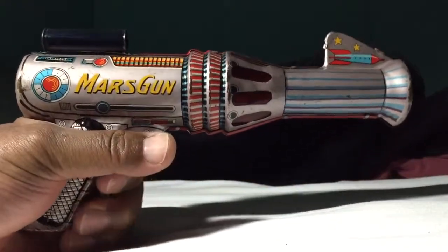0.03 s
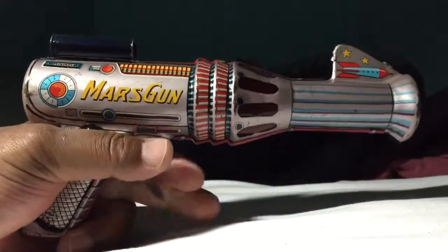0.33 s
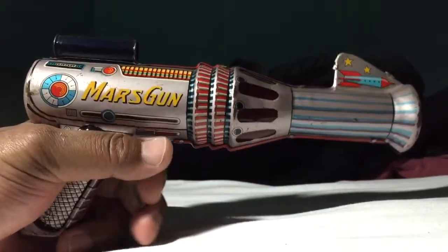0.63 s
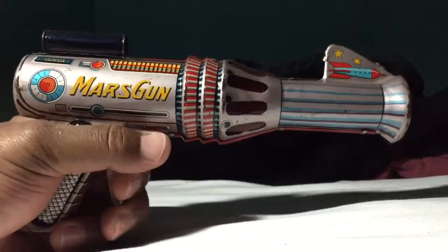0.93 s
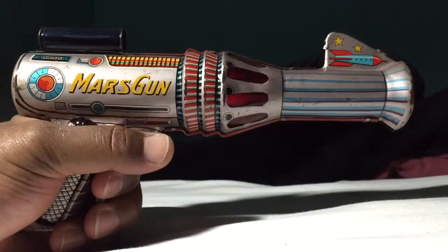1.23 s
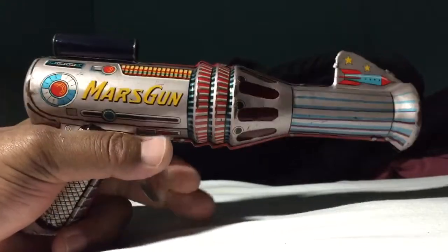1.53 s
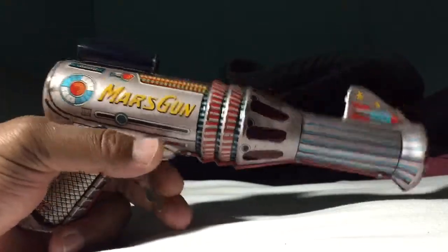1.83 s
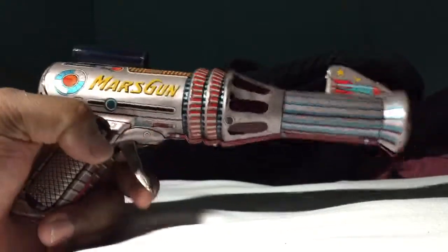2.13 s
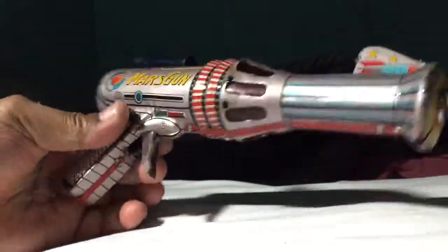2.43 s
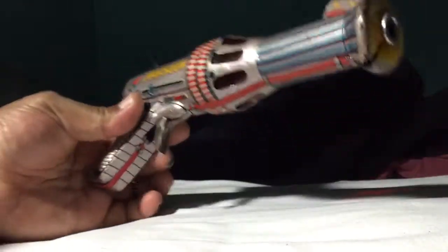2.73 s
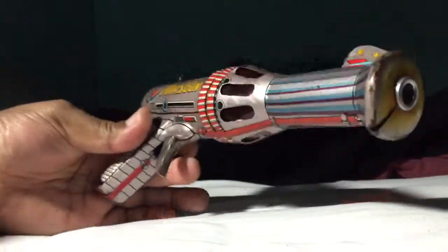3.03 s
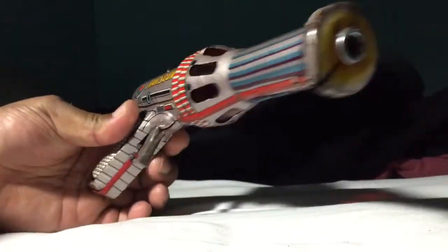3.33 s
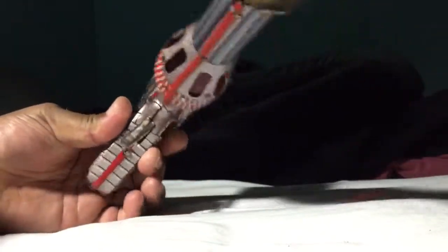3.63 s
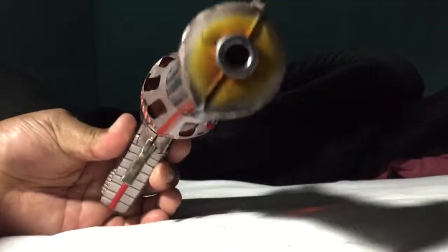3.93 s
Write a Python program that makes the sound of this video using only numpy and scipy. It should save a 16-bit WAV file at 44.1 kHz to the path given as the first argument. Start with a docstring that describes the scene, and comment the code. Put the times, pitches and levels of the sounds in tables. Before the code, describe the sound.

A tin toy gun is fired twice, its gears rattling and flywheel rasping with a thin squeal before winding down. Then the tin shell clicks as it is turned in the hand, close by in a small, quiet room.

```python
"""Tin friction toy gun

The toy is fired twice, close by in a small, soft room. Each squeeze drives rattling gears
that spin up a flywheel. Its axle squeals, and the wheel scrapes a flint once a turn, rings,
and coasts down to separate ticks. Then the trigger slides back and the tin shell clicks
as it is turned in the hand."""
import sys
import numpy as np
from scipy import signal
from scipy.fft import rfft, irfft
from scipy.io import wavfile
from scipy.ndimage import uniform_filter1d

SR = 44100
rng = np.random.default_rng(int(sys.argv[2]) if len(sys.argv) > 2 else 0)


def output_pcm(signal):
    """Save a mono or channel-first signal as 16-bit PCM at the path in sys.argv[1].

    Samples are clipped to [-1, 1] before scaling.
    """
    pcm = np.clip(np.atleast_2d(signal).T, -1, 1) * 32767
    wavfile.write(sys.argv[1], SR, np.round(pcm).astype(np.int16))


N = 176400
T = np.arange(N) / SR

# How fast the gear teeth meet. Each row: time in seconds, teeth per second.
TOOTH_RATE = [(0, 289.5), (.14, 289.3), (.2, 233.3), (.4, 224.5), (.5, 208.2), (.6, 168.2), (.8, 109.9),
              (.92, 269.4), (.98, 264), (1.02, 252), (1.06, 270.1), (1.15, 274.9), (1.25, 330),
              (1.42, 238.5), (1.5, 241.7), (1.56, 274), (1.7, 211.8), (1.84, 152.8)]
# The tones of the tin shell. Each row: pitch in Hz, width in Hz, level in dB.
SHELL_TONES = [(1190, 98, -1), (1425, 26, 6.5), (1544, 13, -6.5), (1870, 26, 11), (2430, 45, 6),
               (3140, 62, 11), (3540, 39, -4), (4400, 61, 4), (5460, 51, 0), (6400, 150, 3.5),
               (6380, 130, 1), (7950, 58, 1.5)]


def flywheel():
    """Once a turn the wheel rubs the flint, which makes a rasp and jolts the wheel's own ring."""
    # How fast the wheel spins. Each row: time in seconds, turns per second.
    wheel_speed = [(0, 600), (.13, 561), (.2, 471), (.4, 281), (.55, 156), (.64, 105), (.71, 97),
                   (.79, 140), (.85, 210), (.9, 302), (.96, 519), (1.27, 628), (1.55, 315), (1.7, 190),
                   (1.8, 124), (1.92, 63), (1.97, 43), (2.0, 25), (2.04, 15)]
    speed = in_time(wheel_speed)
    turns = np.cumsum(speed) / SR
    turn, part_of_turn = turns.astype(int), turns % 1
    strength, kick = rng.standard_normal((2, turn[-1] + 1))
    pressure = flint_pressure(speed, turn, part_of_turn, strength)
    return flint_rasp(pressure, speed) + wheel_ring(part_of_turn, kick[turn])


def flint_pressure(speed, turn, part_of_turn, strength):
    """The flint presses hard early in each turn. A faster wheel rubs for more of it and chatters more."""
    pace = speed / 100  # 1 at 100 turns per second
    rise_share, rub_share, drag_share = 0.05, 0.24 * pace, 0.37  # shares of one turn
    rub = np.minimum(part_of_turn / rise_share, 1) * np.exp(-(part_of_turn / rub_share) ** 2)
    light_drag = from_db(-20) * (part_of_turn < drag_share)
    chatter = from_db(-12) * np.minimum(pace, 2) ** 1.4
    pressure = (rub + light_drag) * from_db(1.2 * strength)[turn] + chatter
    # Even out the power over five turns, so longer rubs are not louder.
    turn_power = np.bincount(turn, pressure ** 2) / np.bincount(turn)
    return pressure / np.sqrt(uniform_filter1d(turn_power, size=5))[turn]


def flint_rasp(pressure, speed):
    """Grit on the wheel strikes the flint in tiny blows that shake the frame."""
    # How loud the rasp is. Each row: time in seconds, level in dB.
    rasp_level = [(0, -18), (.1, -20.5), (.2, -22), (.45, -21), (.6, -23), (.73, -23.5), (.86, -20),
                  (1.0, -20), (1.2, -18.5), (1.42, -22), (1.57, -24.5), (1.8, -23.5), (1.92, -25.5),
                  (2.005, -25), (2.02, -40), (2.045, -48.5)]
    # The rasp's tone colour. Each row: frequency in Hz, level in dB.
    rasp_colour = [(40, -67), (300, -45.5), (650, -20), (1100, -3.5), (2700, 2), (3700, -4), (6000, 1.5),
                   (9700, -4), (10500, -8), (11600, 0.5), (13500, -6.5), (15000, -4.5)]
    # The tones of the flint holder and frame. Each row: pitch in Hz, width in Hz, level in dB.
    frame_tones = [(1317, 120, -12), (2123, 81, 4), (4590, 65, -2.5), (5230, 73, 0.5), (5870, 89, -2),
                   (6360, 140, -8.5), (7116, 300, 3), (8670, 140, 3.5), (9136, 220, 6), (10060, 250, 4),
                   (10730, 120, -2), (11900, 160, -2.5), (14200, 250, -2.5)]
    # Thin edges that sing near top speed. Each row: pitch in Hz, width in Hz, level in dB.
    edge_tones = [(5170, 72, 2), (5595, 82, 2), (6250, 80, 6.5), (6630, 110, 4), (7160, 150, 1.5),
                  (7780, 100, 7.5), (8810, 80, 2.5)]
    force = grains(per_s=14000, spread_db=1.5) * pressure * running(rasp_level)
    frame = from_db(2) * wandering_tones(force, frame_tones, spread_db=1.5)
    racing = 1 / (1 + (480 / speed) ** 3.8)  # one half at 480 turns per second
    edges = from_db(5) * wandering_tones(force * racing, edge_tones, spread_db=1.5)
    return coloured(force, rasp_colour) + frame + edges


def wheel_ring(part_of_turn, kick):
    """Each rub jolts the ringing wheel, and the ring sags until the next rub."""
    # The wheel's own note. Each row: time in seconds, pitch in Hz, level in dB.
    wheel_note = [(0, 2850, -47), (.22, 2830, -49.5), (.25, 2775, -33.5), (.31, 2878, -39.5),
                  (.36, 2864, -44), (.5, 2830, -39), (.55, 2850, -40.5), (.59, 2850, -34),
                  (.685, 2830, -35.5), (.715, 2873, -50), (.8, 2900, -45), (.83, 2876, -34),
                  (.95, 2860, -40.5), (1.12, 2850, -38.5), (1.17, 2870, -52), (1.35, 2870, -48.5),
                  (1.395, 2880, -36), (1.46, 2910, -38), (1.6, 2890, -45.5), (1.68, 2866, -32.5),
                  (1.88, 2903, -35.5), (2.005, 2950, -37.5), (2.045, 2953, -54), (2.06, 2910, -74),
                  (2.13, 2910, -76)]
    jolts = uniform_filter1d(0.39 * kick, size=30)
    sag = uniform_filter1d(from_db(9 * (0.86 - part_of_turn)), size=40)
    return sag * singing(wheel_note, waver_rad=0.65, flutter_db=2, jolts_rad=jolts)


def gears():
    """Loose stamped teeth clatter in their case, louder under load, and hum as they meet."""
    # The load on the gears, heard as loudness. Each row: time in seconds, level in dB.
    gear_load = [(0, -16), (.06, -15.5), (.11, -18.5), (.15, -19), (.25, -27), (.33, -20), (.5, -28.5),
                 (.65, -34), (.84, -60), (.89, -21.5), (.97, -16.5), (1.1, -21), (1.25, -17.5),
                 (1.35, -22.5), (1.45, -22.5), (1.57, -19.5), (1.75, -25.5), (1.9, -30), (2.03, -75)]
    # The rattle's tone colour. Each row: frequency in Hz, level in dB.
    rattle_colour = [(30, -49), (150, -30), (450, -17.5), (660, -16.5), (800, 3.5), (1300, -2),
                     (1550, -1.5), (3200, 1), (4400, -5), (6400, -2), (9500, -1), (10400, -5), (12000, 1),
                     (13700, -6), (15000, 2)]
    # The tones of the gear case. Each row: pitch in Hz, width in Hz, level in dB.
    case_tones = [(866, 83, -3.5), (1017, 59, 1), (2100, 80, -0.5), (3300, 50, 1.5), (3616, 39, 0.5),
                  (5780, 130, 2), (6050, 93, 2), (6620, 82, 0.5), (7270, 180, -0.5), (8150, 170, 2),
                  (9100, 100, 0)]
    # Thin tin tabs that ring as the gears run. Each row: pitch in Hz, width in Hz, level in dB.
    tab_tones = [(5250, 45, 8), (5400, 70, 4)]
    load = running(gear_load)
    wavering_rate = in_time(TOOTH_RATE) * (1 + 0.055 * drift(150))
    tooth_phase = 2 * np.pi * np.cumsum(wavering_rate) / SR
    loose_knocks = grains(per_s=4500, spread_db=-1.5)
    wobble_db = np.cos(tooth_phase) + 2 * drift(70)
    clatter = rms_one(loose_knocks * from_db(wobble_db))
    knocks = load * (from_db(-1) * clatter + from_db(-11.5) * tooth_taps())
    case = from_db(-0.5) * wandering_tones(knocks, case_tones, spread_db=2)
    rattle = coloured(knocks, rattle_colour) + case + resonate(knocks, tab_tones)
    return rattle + gear_hum(tooth_phase) + from_db(-12.5) * load * pings()


def tooth_taps():
    """Each tooth gives one uneven tap, smeared by the case."""
    teeth_passed = np.floor(np.cumsum(in_time(TOOTH_RATE)) / SR)
    taps = np.diff(teeth_passed, prepend=0) * from_db(4.5 * rng.standard_normal(N))
    return rms_one(ring_on(taps, fade_s=0.0041))


def gear_hum(tooth_phase):
    """The teeth meet so quickly that they make a fluttering note."""
    # The parts of the note. Each row: multiple of the tooth rate, level in dB.
    harmonics = [(1, 1.5), (2, -3.5), (3, 11.5)]
    # How loud the hum is. Each row: time in seconds, level in dB.
    hum_level = [(0, -51), (.06, -60.5), (.14, -50), (.25, -60), (.45, -55.5), (.57, -63), (.66, -92),
                 (.88, -84), (.93, -46), (1.02, -52.5), (1.12, -47), (1.3, -49.5), (1.42, -59.5),
                 (1.56, -53), (1.77, -65.5), (1.86, -87)]
    hum = sum(from_db(db + 3.5 * drift(60)) * np.sin(multiple * tooth_phase)
              for multiple, db in harmonics)
    return hum * running(hum_level)


def pings(count=48, low_hz=851.3, high_hz=6500, width_hz=32):
    """Loose tabs and washers, struck at random, each ring briefly at their own pitch."""
    pitches = np.geomspace(low_hz, high_hz, count) * rng.uniform(0.98, 1.03, count)
    hits = grains(per_s=500, spread_db=2)
    struck_part = rng.integers(0, count, N)
    return rms_one(sum(resonate(hits * (struck_part == k), [(hz, width_hz, 0)])
                       for k, hz in enumerate(pitches)))


def axle():
    """The dry axle squeals at a sliding pitch while the trigger drives it."""
    # The squeal. Each row: time in seconds, pitch in Hz, level in dB.
    squeal = [(.08, 2740, -50), (.12, 2670, -33), (.18, 2530, -34), (.23, 2500, -55), (.74, 2640, -62),
              (.79, 2590, -40), (.87, 2500, -35), (.93, 2620, -33), (1.0, 2760, -35), (1.07, 2700, -32),
              (1.13, 2590, -29), (1.17, 2640, -30), (1.22, 2650, -28.5), (1.27, 2730, -30.5),
              (1.35, 2610, -33.5), (1.41, 2560, -52)]
    return singing(squeal, waver_rad=0.7, flutter_db=2.5)


def barrel():
    """Rattling knocks set the hollow barrel ringing."""
    # The barrel's tones. Each row: pitch in Hz, width in Hz, level in dB.
    barrel_tones = [(1132, 74, -0.5), (1210, 36, -3.5)]
    # How loud the barrel is. Each row: time in seconds, level in dB.
    barrel_level = [(0, -42.5), (.04, -28.5), (.07, -23.5), (.105, -25), (.15, -45), (.25, -39),
                    (.31, -32.5), (.38, -42), (.5, -39), (.7, -59.5), (.84, -51.5), (.9, -37.5),
                    (1.0, -31.5), (1.12, -42), (1.24, -28.5), (1.32, -39.5), (1.46, -33.5), (1.56, -42.5),
                    (1.68, -33), (1.85, -39), (2.0, -48), (2.04, -52)]
    ring = resonate(grains(per_s=4500, spread_db=-1.5), barrel_tones)
    steady_ring = ring / np.sqrt(uniform_filter1d(ring ** 2, size=2000) + 1e-12)
    return running(barrel_level) * steady_ring


def gear_catches():
    """The trigger catches the gears with a dull knock at each squeeze."""
    # The knocks. Each row: start in seconds, level in dB.
    catches = [(.002, -3), (.882, 5.5)]
    # Their tone colour. Each row: frequency in Hz, level in dB.
    catch_colour = [(60, -23.5), (250, -9), (600, -2), (1000, 6.5), (3500, 1.5), (6000, -5), (15000, -10.5)]
    blows = np.zeros(N)
    for start_s, db in catches:
        blows[int(start_s * SR)] = from_db(db)
    return coloured(blows + ring_on(blows, fade_s=0.02), catch_colour)


def handling():
    """Clicks and slides shake the tin shell, and loose parts inside rattle on briefly."""
    # The shell's tone colour. Each row: frequency in Hz, level in dB.
    shell_colour = [(100, -50), (720, -22), (1100, 2.5), (2000, 3), (2800, -4.5), (3500, -2), (5000, -7.5),
                    (10000, -6.5), (15000, -15)]
    # The tones of the loose parts. Each row: pitch in Hz, width in Hz, level in dB.
    loose_tones = [(1210, 130, -2), (1450, 160, -4)]
    grit, slips = grains(per_s=7000, spread_db=6.7), grains(per_s=1800, spread_db=3.3)
    click_force, click_rings = clicks(grit)
    slide_force = slides(slips)
    slide_rings = from_db(-13) * resonate(slide_force, SHELL_TONES)
    force = click_force + slide_force
    after_rattle = resonate(ring_on(force, fade_s=0.2), loose_tones)
    shaking = force + from_db(1.5) * ring_on(force, fade_s=0.017)
    return coloured(shaking, shell_colour) + click_rings + slide_rings + after_rattle


def clicks(grit, rise_s=0.00034, panel_width_hz=56):
    """Short gritty contacts ring the touched panel and the shell. Gives the force and the ringing."""
    # Clicks of the trigger and loose tin parts. Each row: start in seconds, level in dB,
    # treble in dB, contact time in seconds, the panel's main and second pitch in Hz.
    contacts = [(2.031, -20.5, 7.5, 0.0019, 2850, 11630), (2.063, -30.5, 7, .004, 1600, 4440),
                (2.1366, -13.5, -7, 0.0015, 3400, 1215), (2.185, -13.5, -9.5, .004, 1980, 4440),
                (2.218, -22, -4, 0.0018, 1190, 3940), (2.226, -21.5, 4, 0.0041, 1340, 4480),
                (2.252, -16, -1, .002, 1240, 3830), (2.274, -16.5, 3.5, 0.0035, 1580, 5670),
                (2.305, -3.5, -0.5, 0.0022, 1140, 4200), (2.31, -13.5, 2, 0.0021, 1587, 6500),
                (2.587, -29.5, -30, .0045, 1150, 2220), (2.771, -26.5, -18, 0.00096, 1243, 2095),
                (2.875, -8, -8, 0.0047, 1550, 2095), (2.977, -20, -21, .0037, 1290, 2000),
                (3.006, -20, -15, .0047, 1220, 2160), (3.042, -16, 1, 0.0063, 1350, 10100),
                (3.151, -16.5, -6, 0.0018, 1685, 8500), (3.18, -21.5, -17, 0.0055, 1310, 1920),
                (3.299, -15, 0.5, 0.0037, 4506, 6780), (3.4487, -5.5, 1, 0.0042, 1880, 3140),
                (3.484, -19.5, -21, .0023, 1210, 2470), (3.529, -21, -2, 0.0063, 1320, 6500),
                (3.658, -27.5, -17.5, 0.0045, 1273, 2520), (3.739, -20.5, -10, .0027, 1946, 3240)]
    force, rings = np.zeros((2, N))
    age = T[:SR // 10]
    for start_s, db, treble_db, contact_s, main_hz, second_hz in contacts:
        start = int(start_s * SR)
        span = slice(start, start + len(age))
        contact = grit[span] * np.exp(-age / contact_s) * np.minimum(age / rise_s, 1)
        contact = softened(contact * from_db(db) / (np.linalg.norm(contact) + 1e-9), treble_db)
        panel = [(main_hz, panel_width_hz, 16.5), (second_hz, panel_width_hz, 13)]
        # The grip changes the pitch and strength of each shell tone from click to click.
        held_shell = [(hz * (1 + 0.05 * rng.normal()), width, tone_db - 2.5 + 4 * rng.normal())
                      for hz, width, tone_db in SHELL_TONES]
        force[span] += contact
        rings[span] += resonate(contact, panel + held_shell)
    return force, rings


def slides(slips):
    """Tin slides on tin or under the fingers in a run of tiny slips. Gives their force."""
    # Each row is one slide: middle in seconds, half its length in seconds, level in dB, treble in dB.
    strokes = [(2.26, 0.057, -33, -7), (2.424, .04, -59, -5), (2.473, 0.03, -49, -18.5),
               (2.842, 0.14, -59.5, -5), (2.966, 0.025, -56, -18), (3.038, 0.046, -43, -20),
               (3.147, 0.012, -54, 4), (3.278, 0.031, -52, -10), (3.466, 0.055, -45.5, -26),
               (3.53, 0.028, -38.5, -13), (3.602, 0.016, -53, -17), (3.661, 0.039, -61, -17),
               (3.863, .04, -68, -0.5)]
    return sum(softened(slips * swell(middle_s, half_s) + 1e-18, treble_db) * from_db(db)
               for middle_s, half_s, db, treble_db in strokes)


def hand_bumps():
    """The hand bumps softly on the grip, making low thuds."""
    # Each row is one bump: middle in seconds, half its length in seconds, level in dB.
    bumps = [(0.06, 0.35, -59), (0.905, 0.079, -65), (1.293, 0.18, -59.5), (2.76, 0.039, -66),
             (3.783, 0.024, -61), (3.88, 0.044, -68)]
    # Their deep tone colour. Each row: frequency in Hz, level in dB.
    bump_colour = [(20, -28.5), (55, -3.5), (120, 1), (250, -8.5), (600, -44.5), (2000, -57.5)]
    level = sum(from_db(db) * swell(middle_s, half_s) for middle_s, half_s, db in bumps)
    return level * rms_one(coloured(rng.standard_normal(N), bump_colour))


def faint_hum(pitch_hz=257.3, width_hz=55):
    """A narrow band of noise is heard as a low hum that swells twice."""
    # Each row is one swell: middle in seconds, half its length in seconds, level in dB.
    swells = [(2.802, 0.74, -79.5), (3.476, 0.23, -68.5)]
    edges_hz = [pitch_hz - width_hz / 2, pitch_hz + width_hz / 2]
    band = signal.butter(2, edges_hz, "band", fs=SR, output="sos")
    level = sum(from_db(db) * swell(middle_s, half_s) for middle_s, half_s, db in swells)
    return level * rms_one(signal.sosfilt(band, rng.standard_normal(N)))


def room_noise():
    """A quiet rush fills the room and sinks a little near the end."""
    # Its tone colour. Each row: frequency in Hz, level in dB.
    noise_colour = [(15, -38.5), (25, -3.5), (176, -6), (833, -15.5), (978, -14), (1860, -11.5),
                    (2500, -19), (3090, -18), (3830, -19.5), (8780, -23), (15000, -25.5)]
    # How its loudness moves. Each row: time in seconds, change in dB.
    level_change = [(2.4, 3.5), (2.8, 3.5), (3.4, 1), (4, -1)]
    noise = rms_one(coloured(rng.standard_normal(N), noise_colour))
    return noise * from_db(-71.5 + in_time(level_change))


def from_db(db):
    """Turn decibels into a number to multiply by."""
    return 10 ** (np.asarray(db) / 20)


def rms_one(x):
    """Scale a signal so its average power is 1."""
    return x / np.sqrt(np.mean(x ** 2) + 1e-20)


def in_time(rows):
    """Join rows of time and value with straight lines."""
    return np.interp(T, *np.transpose(rows))


def running(rows):
    """A loudness curve from rows of time and dB, silent after the last row."""
    return from_db(in_time(rows)) * (T < rows[-1][0])


def swell(middle_s, half_s):
    """A smooth rise and fall."""
    return np.cos(np.pi / 2 * np.clip((T - middle_s) / half_s, -1, 1)) ** 2


def drift(per_s):
    """A random wander of about size 1 that heads for a new value per_s times a second."""
    return rms_one(np.interp(T * per_s, np.arange(4000), rng.standard_normal(4000)))


def grains(per_s, spread_db):
    """Tiny random impacts of uneven size."""
    sizes = from_db(spread_db * np.minimum(rng.exponential(1, N), 4))
    signs = rng.choice([-1, 1], N)
    return rms_one(sizes * signs * (rng.random(N) < per_s / SR))


def coloured(x, points, size=4096):
    """Give a sound a tone colour, from rows of Hz and dB."""
    hz, db = np.transpose(points)
    grid_hz = np.maximum(np.arange(size // 2 + 1) * SR / size, 1)
    gains = from_db(np.interp(np.log(grid_hz), np.log(hz), db))
    # Fold the filter so that it never sounds before the blow that starts it.
    cepstrum = irfft(np.log(gains))
    cepstrum[1:size // 2] *= 2
    cepstrum[size // 2 + 1:] = 0
    return signal.fftconvolve(x, irfft(np.exp(rfft(cepstrum))))[:N]


def softened(x, treble_db, corner_hz=2640):
    """Turn the treble down or up: softer contacts carry less of it."""
    low_pass = signal.butter(1, corner_hz, fs=SR)
    dull = signal.lfilter(*low_pass, signal.lfilter(*low_pass, x))
    return from_db(treble_db) * x + (1 - from_db(treble_db)) * dull


def resonate(x, tones, bass_cut_hz=750):
    """Let a force ring a set of tones, then cut the bass. Narrower tones ring longer."""
    ringing = 0
    for k, (hz, width_hz, db) in enumerate(tones):
        decay = np.exp(-np.pi * width_hz / SR)
        feedback = [1, -2 * decay * np.cos(2 * np.pi * hz / SR), decay ** 2]
        gain = (-1) ** k * from_db(db) * (1 - decay ** 2) / 2
        ringing = ringing + gain * signal.lfilter([1, 0, -1], feedback, x + 1e-18)
    return signal.sosfilt(signal.butter(4, bass_cut_hz, "high", fs=SR, output="sos"), ringing)


def wandering_tones(x, tones, spread_db):
    """Ring a set of tones whose strengths each wander on their own."""
    return sum((-1) ** k * resonate(x * from_db(spread_db * drift(11)), [tone])
               for k, tone in enumerate(tones))


def ring_on(x, fade_s):
    """Countless close tones or echoes blur into a noisy tail that falls 60 dB in fade_s."""
    age = T[:SR // 2]
    tail = rng.standard_normal(len(age)) * from_db(-60 * age / fade_s)
    return signal.fftconvolve(x, tail / np.linalg.norm(tail))[:N]


def singing(rows, waver_rad, flutter_db, jolts_rad=0):
    """An unsteady metal note, from rows of time, pitch and dB."""
    pitch = in_time([(s, hz) for s, hz, db in rows])
    level = running([(s, db) for s, hz, db in rows])
    tone = np.sin(2 * np.pi * np.cumsum(pitch) / SR + jolts_rad + waver_rad * drift(70))
    return level * rms_one(tone * from_db(flutter_db * drift(90)))


def scene():
    """The toy, its short, slightly dull room echo and the background, the same in both channels."""
    toy = flywheel() + gears() + axle() + barrel() + gear_catches() + handling()
    echo = signal.lfilter(*signal.butter(1, 9100, fs=SR), ring_on(toy, fade_s=0.14))
    background = room_noise() + faint_hum() + hand_bumps()
    return np.tile(toy + from_db(-10.5) * echo + background, (2, 1))


def record(dry):
    """Cut the highest treble steeply."""
    cutoff_hz = 15400
    return signal.sosfilt(signal.ellip(12, 0.1, 80, cutoff_hz, fs=SR, output="sos"), dry)


dry = scene()
out = record(dry)
output_pcm(out)
```